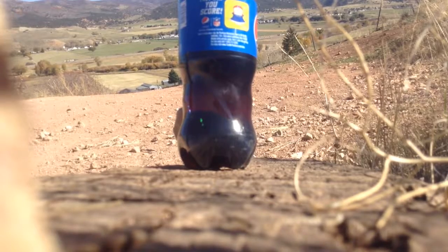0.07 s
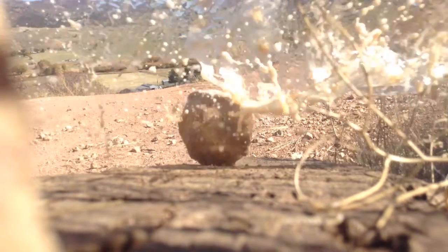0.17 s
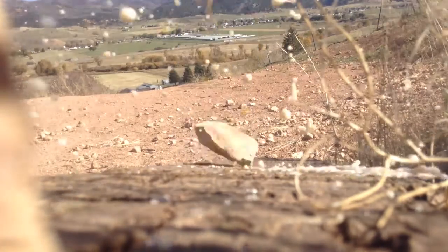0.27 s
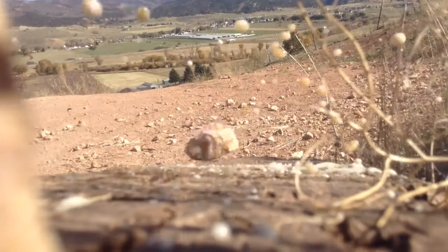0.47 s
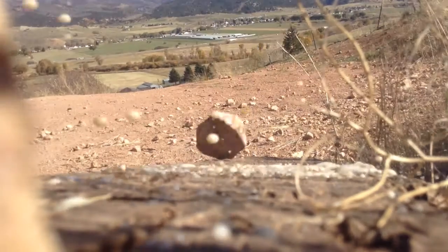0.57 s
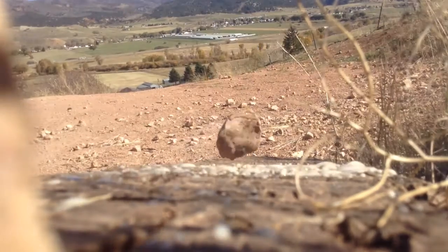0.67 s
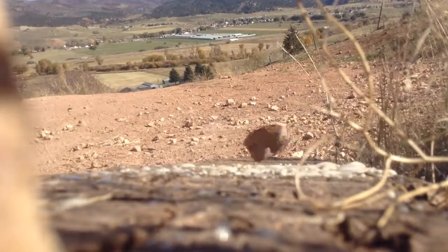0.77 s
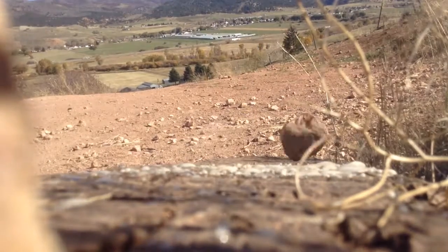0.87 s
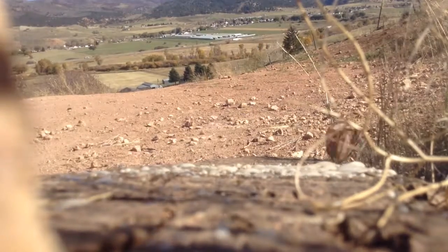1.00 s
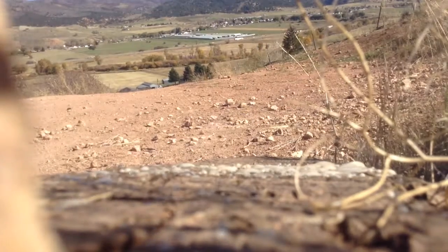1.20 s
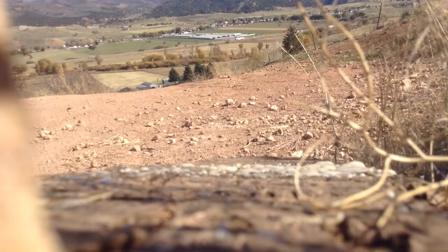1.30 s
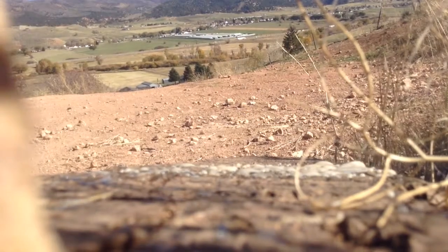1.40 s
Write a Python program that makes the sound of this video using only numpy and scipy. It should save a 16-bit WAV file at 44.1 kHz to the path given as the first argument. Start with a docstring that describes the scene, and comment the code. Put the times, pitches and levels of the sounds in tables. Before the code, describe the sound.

Sharp crack of a shot soda bottle, followed by splatter and rattling knocks on wood.

```python
"""Sharp cracks and deep thumps break over a faint outdoor rumble as the microphone overloads: a shot
bursts a plastic soda bottle. Its shell rings as it tears, and spray hisses out.
Debris and a tumbling stone knock on the log that carries the camera. Each blow rings the log's modes
and sets it shuddering, so the camera chatters on it about once a cycle. Spilled soda fizzes on."""
import sys
import numpy as np
from scipy import signal
from scipy.fft import rfft, irfft, next_fast_len
from scipy.io import wavfile
from scipy.ndimage import uniform_filter1d

SR = 44100
rng = np.random.default_rng(int(sys.argv[2]) if len(sys.argv) > 2 else 0)


def wrap_up_sound(samples):
    """Save the sound to the file named by the first command line argument, as 16-bit audio."""
    columns = np.atleast_2d(samples).T
    # keep every value between -1 and 1, then stretch to whole-number steps
    tamed = np.clip(columns, -1, 1)
    steps = np.round(tamed * 32767).astype(np.int16)
    wavfile.write(sys.argv[1], SR, steps)


N = 63945

# Cracks of the tearing bottle: start_s, hold_s, level_db
CRACKS = [(0.2009, 0.013, -21.5), (.2087, 0.0016, -1), (0.2137, 0.0047, -1), (0.2194, .003, -11),
          (0.231, 0.0024, -4.5), (0.2434, 0.0093, -23)]
# Spectrum of the tearing noise: frequency_hz, level_db
CRACK_SPECTRUM = [(30, 3.5), (100, -9), (220, -1.5), (400, -4), (700, -18.5), (1200, -8), (1700, -4.5),
                  (2050, -7), (2500, 0), (3400, -8.5), (5300, -12.5), (8000, -22.5), (13500, -29.5),
                  (16000, -51)]
# Modes of the plastic shell: pitch_hz, level_db
SHELL_MODES = [(388, -5.5), (774, -3), (1103, -12), (1270, -20), (1484, -5.5), (2005, 4), (2336, 3),
               (2546, 0.5), (2796, -24), (3062, -23), (3262, -11), (4727, -5), (5563, -14), (7850, -8.5)]
# Deep thumps under the cracks as the microphone overloads: start_s, level_db
LOW_THUMPS = [(0.2128, -9.5), (0.222, -23), (0.2325, -19)]
# Envelope of the spray and its fizz: time_s, level_db
SPRAY_ENVELOPE = [(.205, -64), (.238, -52), (.258, -19.5), (.264, -32.5), (.29, -21), (.3, -28),
                  (.312, -20), (.321, -32), (.326, -31), (.342, -44), (.352, -32.5), (.386, -37.5),
                  (.46, -45), (.55, -49.5), (.7, -50.5), (1.1, -49.5), (1.45, -50)]
# Spectra of the spray and of the foam: frequency_hz, level_db
SPRAY_SPECTRUM = [(100, -60), (200, -20.5), (900, -14.5), (1500, -11), (2200, -2.5), (2520, 4),
                  (2880, -4.5), (3400, -8.5), (4200, -21.5), (5200, -23), (6500, -29.5), (10000, -37),
                  (15000, -47)]
FOAM_SPECTRUM = [(200, -29), (600, 2.5), (1500, -19), (3000, -0.5), (4000, -6.5), (5000, -2.5), (6300, -14),
                 (10000, -22), (15000, -52)]
# Hits of drops, grit and plastic shreds: start_s, level_db, pitch_hz
SPLATS = [(0.31, -18, 2660), (.333, -20, 2520), (0.3518, -21, 2500), (0.5995, -11, 2570),
          (0.68, -28.5, 1830), (0.6972, -27, 2410), (1.0737, -26, 2340), (1.293, -33, 2360)]
# Blows on the log: start_s, contact_db, contact_hz, ring_db, shudder_db, shudder_hz
KNOCKS = [(0.351, -26.5, 890, -38, -41, 190), (.392, -16, 657, -20, -20.5, 204.8),
          (0.4712, -15.5, 594, -13.5, -22.5, 211.6), (0.589, -26.5, 670, -26.5, -22.5, 237),
          (0.5993, -9, 655, -11.5, -18, 207), (0.623, -13.5, 950, -18, -20.5, 213),
          (0.6792, -8.5, 833, -25, -29.5, 185), (.6852, -19.5, 910, -37, -66, 188),
          (0.7549, -55, 303, -34.5, -28.5, 208), (0.8328, -36, 360, -19, -21.5, 223),
          (0.904, -62, 302, -30, -18.5, 222), (0.9107, -17.5, 352, -10, -15.5, 209),
          (0.9369, -48, 300, -33.5, -20.5, 195), (0.951, -50, 298, -41, -26, 190.3),
          (1.013, -30.5, 293, -39, -22, 217.5), (1.067, -40, 350, -41, -25, 202.8),
          (1.075, -39, 477, -26.5, -18, 203)]
# Modes of the log: pitch_hz, level_db, t60_s
LOG_MODES = [(293, -2.5, 0.041), (429, -0.5, 0.039), (526, -3, 0.038), (782, -9, 0.027), (929, -2, 0.022),
             (1264, -3, 0.018), (1710, 1, 0.0061)]
# Spectrum of the rough, woody after-ring: frequency_hz, level_db
WOOD_SPECTRUM = [(40, -27), (100, 7), (170, 1), (300, 7), (430, -4.5), (650, -7.5), (1100, -8.5),
                 (1600, -9), (3000, -45)]
# Bouts of camera chatter, the shortest a single tap: start_s, length_s, level_db, fade_db, cutoff_hz
CHATTER_BOUTS = [(0.3975, 0.0026, -16, 19, 11300), (0.404, 0.027, -14, 20, 13200),
                 (0.4266, 0.023, -27, 2, 8300), (0.478, .003, -19, 8, 5530),
                 (0.489, 0.01, -14.5, 3.5, 9500), (.5085, .008, -36, 0, 5500),
                 (0.5207, 0.0025, -23.5, 14, 7100), (0.6046, 0.039, -12.5, 7.5, 10900),
                 (0.763, 0.004, -31, -9.5, 5570), (0.84, .003, -25, 3, 5560), (0.8467, .012, -21, 9, 6500),
                 (0.91, 0.0073, -24, -5, 5570), (0.9238, .003, -16.5, 4, 9300),
                 (0.9305, 0.044, -13.5, 3.5, 8640), (1.023, .004, -24, 0, 5000),
                 (1.033, .004, -24, 0, 6100), (1.0778, .004, -22, 5, 6500), (1.0842, 0.0027, -19, 20, 7900),
                 (1.0912, 0.0036, -14, 8, 7400)]
# Modes of the camera case: pitch_hz, level_db, t60_s
CASE_MODES = [(2530, -4.5, 0.0052), (3090, -1, 0.0036), (3430, -6.5, .008), (4800, -11, 0.0074),
              (7320, -11, 0.0027), (9400, -40, 0.0035)]
# Spectrum of grit ground under the case: frequency_hz, level_db
GRIT_SPECTRUM = [(1200, -23), (2300, -12), (3300, 8), (4200, -6), (4900, 3.5), (6000, -17), (7500, -9),
                 (10000, -17), (15000, -22)]
# Spectrum of the outdoor rumble: frequency_hz, level_db
RUMBLE_SPECTRUM = [(25, -49), (60, -17), (110, -4), (160, -5.5), (210, -0.5), (330, -12.5), (480, -18),
                   (700, -12.5), (1200, -22.5), (1800, -37), (3000, -49.5), (15000, -50.5)]
# Frequency response of the microphone: frequency_hz, gain_db
MICROPHONE_RESPONSE = [(25, 8.5), (55, -0.5), (95, -5.5), (150, 0.5), (15000, 0)]


def burst(attack_s=0.00069, t60_s=0.012, linewidth_hz=11.8, shell_db=-5.5, tearing_db=-2):
    """Fracture excites noise and the shell's modes; added low pulses give the thump of overload."""
    t = np.arange(N) / SR
    envelope = sum(decay(np.maximum(t - start - hold, 0), t60_s, db) * ramp(t - start, attack_s)
                   for start, hold, db in CRACKS)
    # A random walk in phase broadens each mode.
    drifts = np.cumsum(rng.standard_normal((len(SHELL_MODES), N)), axis=1)
    drifts *= np.sqrt(2 * np.pi * linewidth_hz / SR)
    shell = unit(sum(amp(db) * np.sin(2 * np.pi * hz * t + drift)
                     for (hz, db), drift in zip(SHELL_MODES, drifts)))
    tearing = coloured(rng.standard_normal(N), CRACK_SPECTRUM)
    out = highpass(envelope * (amp(shell_db) * shell + amp(tearing_db) * tearing), hz=145, order=3)
    age = t / 0.0024  # the pulse swings negative at age 1
    thump = lowpass((1 - age) * np.exp(-age), hz=900)
    for start, db in LOW_THUMPS:
        add(out, start, amp(db) * thump)
    return out


def soda(spray_start_s=0.18, foam_start_s=0.24, foam_db=-55.5):
    """Incoherent sources sum to noise: droplets hiss and thin out, while foam keeps fizzing."""
    t = np.arange(N) / SR
    envelope = ramp(t - spray_start_s, rise_s=0.01) * amp(np.interp(t, *np.transpose(SPRAY_ENVELOPE)))
    spray = envelope * coloured(grains(spread_db=2), SPRAY_SPECTRUM)
    fizz = coloured(grains(spread_db=2), FOAM_SPECTRUM)
    foam = amp(foam_db) * ramp(t - foam_start_s, rise_s=0.1) * fizz
    return highpass(spray + foam, hz=150, order=3)


def splats(noise_db=-1):
    """Each small impact is a heavily damped oscillation: a ping in a band of noise."""
    out, t = np.zeros(N), np.arange(SR // 20) / SR
    envelope = decay(t, t60_s=0.0092) * onset(t, tau_s=0.00039)
    envelope /= envelope.max()
    for start, db, hz in SPLATS:
        noise = coloured(rng.standard_normal(len(t)), SPRAY_SPECTRUM)
        noise = lowpass(highpass(noise, 0.77 * hz, order=4), hz=4650)
        add(out, start, amp(db) * envelope * (np.sin(2 * np.pi * hz * t) + amp(noise_db) * noise))
    return out


def knocks(contact_delay_s=0.00069, swell_peak_s=0.0093, swell_width_s=0.0047, cutoff_ratio=2.04):
    """Impulses excite the log's modes and a low shudder; a shorter contact reaches higher modes."""
    out, t = np.zeros(N), np.arange(SR // 4) / SR
    contact_time = np.arange(N) / SR - contact_delay_s
    swell = np.exp(-0.5 * ((t - swell_peak_s) / swell_width_s) ** 2)
    shudder_envelope = (swell + decay(t, t60_s=0.22, db=-10.5)) * onset(t, tau_s=0.0018)
    for start, contact_db, contact_hz, ring_db, shudder_db, shudder_hz in KNOCKS:
        # The contact is one short pulse whose spectrum peaks at contact_hz.
        exponent = np.minimum((np.pi * contact_hz * (contact_time - start)) ** 2, 50)
        out += amp(contact_db) * (1 - 2 * exponent) * np.exp(-exponent)
        ring = lowpass(log_ring(t), cutoff_ratio * contact_hz, order=3)
        shudder = amp(shudder_db) * shudder_envelope * np.sin(2 * np.pi * shudder_hz * t)
        add(out, start, highpass(amp(ring_db) * ring + shudder, hz=131, order=3))
    return out


def log_ring(t, spread_db=1.5, detune=0.03):
    """Free vibration of the log: damped modes, varying from blow to blow, over a rough after-ring."""
    scatter = rng.standard_normal((len(LOG_MODES), 2))
    modes = sum(decay(t, t60, db + spread_db * louder) * np.sin(2 * np.pi * hz * (1 + detune * up) * t)
                for (hz, db, t60), (louder, up) in zip(LOG_MODES, scatter))
    wood = decay(t, t60_s=0.15, db=-14) * coloured(rng.standard_normal(len(t)), WOOD_SPECTRUM)
    return (modes + wood) * onset(t, tau_s=0.00081)


def chatter(rate_hz=191, max_taps=10, jitter_s=0.0005, spread_db=2, grit_db=-23.5):
    """Intermittent contact: the camera taps the log about once a shudder cycle and grinds on grit."""
    out, t = np.zeros(N), np.arange(SR // 8) / SR
    for start, length, db, fade_db, cutoff_hz in CHATTER_BOUTS:
        grit = coloured(grains(spread_db=0.5, size=len(t)), GRIT_SPECTRUM)
        release = decay(np.maximum(t - length, 0), t60_s=0.084)
        bout = amp(db + grit_db - fade_db * ramp(t, length)) * release * grit
        for cycle, (later, louder) in enumerate(rng.standard_normal((max_taps, 2))):
            delay = cycle / rate_hz
            gate = ramp(length - delay, 0.5 / rate_hz)  # closes over the bout's last half cycle
            tap_db = db - fade_db * ramp(delay, length) + spread_db * louder
            add(bout, delay + jitter_s * later, gate * amp(tap_db) * case_tap())
        add(out, start, lowpass(highpass(bout, hz=2270, order=5), cutoff_hz, order=5))
    return out


def case_tap(spread_db=1.7, detune=0.051, rebound_s=0.00182, rebound_db=-12.5):
    """An inelastic collision rings the camera case's modes, with a scratch and one weak rebound."""
    t = np.arange(SR // 80) / SR
    tap = np.zeros(len(t))
    for hz, db, t60 in CASE_MODES:
        envelope = decay(t, t60, db + rng.normal(0, spread_db))
        pitch_hz = hz * (1 + rng.normal(0, detune))
        tap += envelope * np.sin(2 * np.pi * (pitch_hz * t + rng.random()))
    tap += decay(t, t60_s=0.0018, db=-13.5) * rng.standard_normal(len(t))
    add(tap, rebound_s * (0.5 + rng.random()), amp(rebound_db) * tap)
    return tap


def hillside_echo(x, level_db=-29.5):
    """Diffuse scattering from the stony slope returns a weak, exponentially decaying tail."""
    t = np.arange(SR // 2) / SR
    scatter = highpass(lowpass(rng.standard_normal(len(t)), hz=5250), hz=254, order=4)
    tail = scatter * decay(t, t60_s=0.73)
    return amp(level_db) * signal.fftconvolve(x, tail / np.linalg.norm(tail))[:N]


def rumble(level_db=-46, drop_db=8.5, drop_s=1.46):
    """Ambient noise, with its energy at low frequencies, sinks towards the end."""
    sink = ramp(np.arange(N) / SR, drop_s) ** 2
    return amp(level_db - drop_db * sink) * coloured(rng.standard_normal(N), RUMBLE_SPECTRUM)


def amp(db):
    """Decibels to amplitude ratio."""
    return 10 ** (np.asarray(db) / 20)


def unit(x):
    """Normalisation to rms 1."""
    return x / np.sqrt(np.mean(x ** 2) + 1e-20)


def decay(t, t60_s, db=0):
    """Exponential damping: the level starts at db and loses 60 dB every t60_s."""
    return amp(db - 60 * t / t60_s)


def onset(t, tau_s):
    """Exponential approach from 0 to 1."""
    return 1 - np.exp(-t / tau_s)


def ramp(t, rise_s):
    """Linear rise from 0 to 1, then held."""
    return np.clip(t / rise_s, 0, 1)


def grains(spread_db, size=N):
    """Random amplitude modulation: noise whose level shifts from millisecond to millisecond."""
    noise = rng.standard_normal(size)
    flicker = unit(uniform_filter1d(rng.standard_normal(size), size=60))
    return noise * amp(spread_db * flicker)


def gain_at(hz, spectrum):
    """Gain of a spectrum table, interpolated in decibels over log frequency."""
    frequency_hz, level_db = np.transpose(spectrum)
    return amp(np.interp(np.log(hz + 1), np.log(frequency_hz), level_db))


def filtered(x, response):
    """Linear filtering: the spectrum of x times a frequency response."""
    size = next_fast_len(len(x) + 8192)
    return irfft(rfft(x, size) * response(np.fft.rfftfreq(size, 1 / SR)), size)[:len(x)]


def coloured(x, spectrum):
    """Spectral shaping by a table, at rms 1."""
    return unit(filtered(x, lambda hz: gain_at(hz, spectrum)))


def lowpass(x, hz, order=2):
    """Attenuation above hz."""
    return signal.sosfilt(signal.butter(order, hz, fs=SR, output="sos"), x)


def highpass(x, hz, order=2):
    """Attenuation below hz."""
    return signal.sosfilt(signal.butter(order, hz, "high", fs=SR, output="sos"), x)


def add(track, start_s, sound):
    """Superposition of a sound on a track, in place."""
    part = track[max(round(start_s * SR), 0):][:len(sound)]
    part += sound[:len(part)]


def scene():
    """Airborne and structure-borne sound superpose; only the burst and the splats echo."""
    transients = burst() + splats()
    return (transients + hillside_echo(transients) + soda() + knocks() + chatter() + rumble())[None]


def record(dry, band_edge_hz=15900, taper_hz=700):
    """Saturation rounds the burst's peaks; the microphone dips the upper bass and limits the band."""
    def response(hz):
        band_limit = np.clip((band_edge_hz - hz) / taper_hz, 0, 1) ** 2
        return gain_at(hz, MICROPHONE_RESPONSE) * band_limit

    saturated = dry[0] / (1 + np.abs(dry[0]) ** 4) ** (1 / 4)
    return filtered(saturated, response)[None]


dry = scene()
out = record(dry)
wrap_up_sound(out)
```